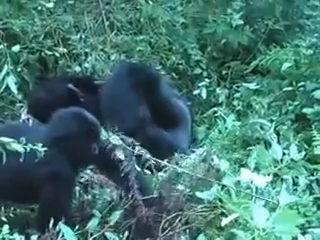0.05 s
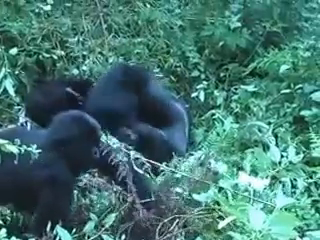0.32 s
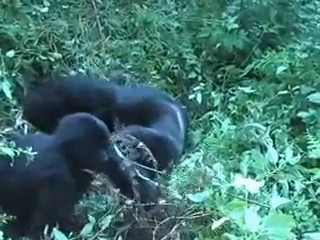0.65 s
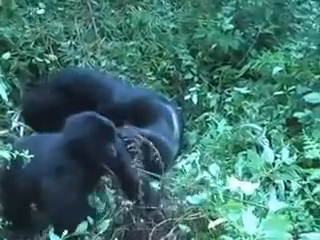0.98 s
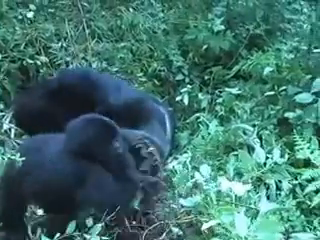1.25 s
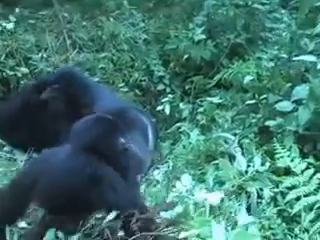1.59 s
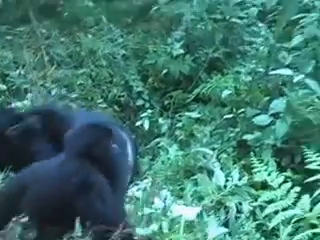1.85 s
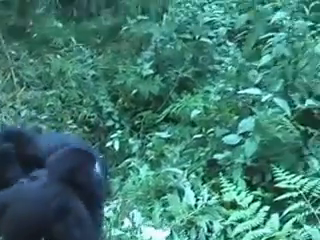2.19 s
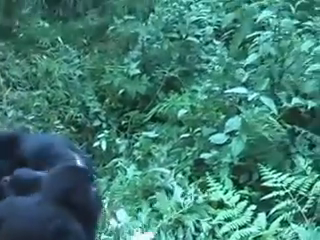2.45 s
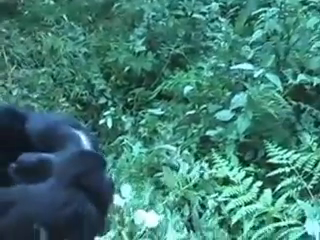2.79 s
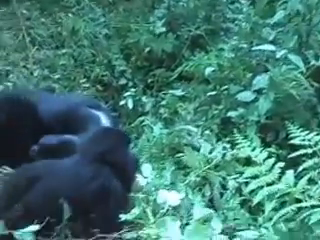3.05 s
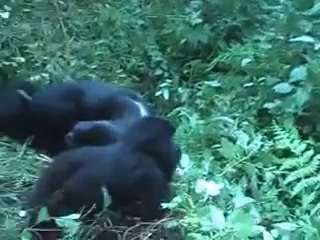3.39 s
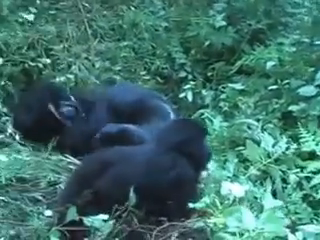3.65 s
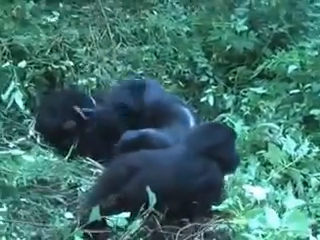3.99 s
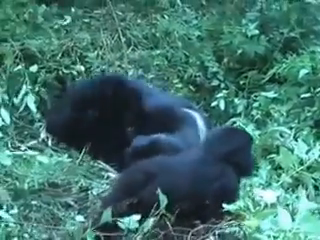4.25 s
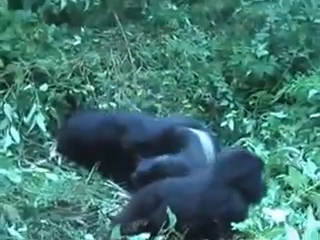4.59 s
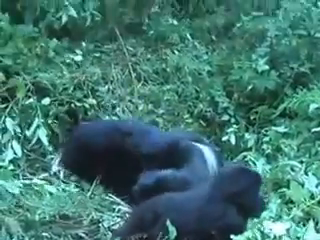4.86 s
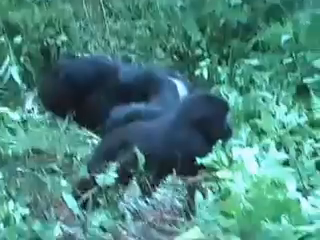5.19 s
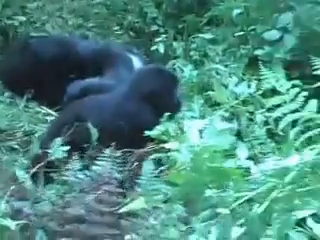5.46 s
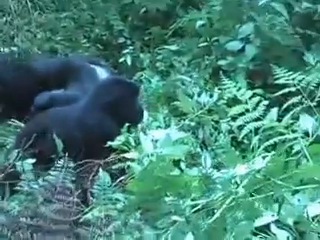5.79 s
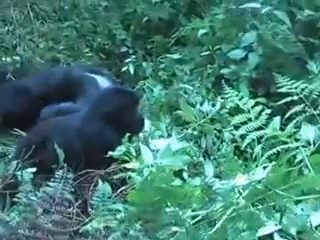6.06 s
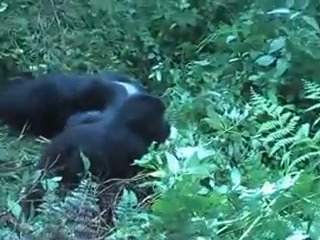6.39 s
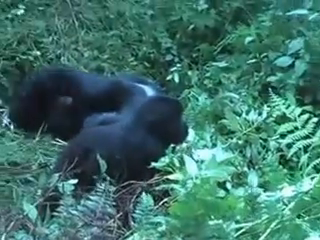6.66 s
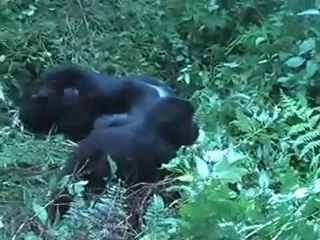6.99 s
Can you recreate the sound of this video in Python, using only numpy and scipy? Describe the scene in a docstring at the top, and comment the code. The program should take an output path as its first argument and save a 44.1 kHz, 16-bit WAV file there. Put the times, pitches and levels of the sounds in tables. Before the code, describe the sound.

A few metres away in dense forest, gorillas wrestle with low, rattling, breathy grunts, short chuckles and faint wheezes. The pants start spaced out, then come faster and hissier in the second half. Stems snap sharply and thicker stalks knock as they break, standing out above the soft rustle of crushed leaves. A small bird repeats a thin, high call over a quiet, steady forest murmur.

```python
"""Gorillas play-wrestling in undergrowth

A few metres away, gorillas pant, chuckle and wheeze: slack vocal folds drive the throat's air sacs,
and turbulent breath excites the resonances of mouth or nose. Stems snap and leaves rustle under them.
A small bird repeats a thin call with both sides of its syrinx, over the steady noise of the forest."""
import sys
import numpy as np
from scipy import signal
from scipy.fft import rfft, irfft, next_fast_len
from scipy.io import wavfile
from scipy.ndimage import uniform_filter1d, map_coordinates

SR = 44100
rng = np.random.default_rng(int(sys.argv[2]) if len(sys.argv) > 2 else 0)


def output_pcm(signal):
    """Save a mono or channel-first signal as 16-bit PCM at the path in sys.argv[1].

    Samples are clipped to [-1, 1] before scaling.
    """
    pcm = np.clip(np.atleast_2d(signal).T, -1, 1) * 32767
    wavfile.write(sys.argv[1], SR, np.round(pcm).astype(np.int16))


N = 309141
TIME = np.arange(N) / SR

# Resonances of the nose, open mouth and teeth: (frequency [Hz], bandwidth [Hz], gain [dB])
NOSE_MODES = [(1035, 170, -6), (1860, 770, -3), (2970, 130, -11.5), (4700, 4700, -1.5)]
MOUTH_MODES = [(795, 240, 10), (1335, 220, 6.5), (2036, 610, 1), (2620, 1100, 9), (3330, 380, 4)]
TEETH_MODES = [(7500, 1300, -3.5), (8420, 1900, 1.5), (12200, 1900, -4.5)]
# Pants: (start [s], end [s], voice [dB], fold slackness [0-1], breath [dB], mouth opening [0-1],
# hoarse ring [Hz], ring [dB], tongue hiss [Hz], hiss [dB], sizzle at the teeth [dB])
PANTS = [ (0.349, 0.51, -55.5, 0.42, -67, 0.3, 2850, -73, 6800, -71, -59.5),
         (0.901, 1.166, -44, .17, -53, 0.09, 2910, -51.5, 5000, -68, -64),
         (1.397, 1.614, -43.5, 0.3, -51, 0.14, 2800, -54, 5950, -74, -59.5),
         (1.873, 2.172, -49.5, 0.41, -57.5, 0.22, 2870, -60, 5360, -65, -82),
         (2.427, 2.633, -46, 0.59, -52, 0.95, 2190, -60, 5670, -59, -59.5),
         (2.849, 3.06, -49, 0.49, -51.5, 0.44, 2720, -67, 5530, -58.5, -67),
         (3.291, 3.454, -49.5, 0.74, -59, 0.5, 3270, -58.5, 5300, -69, -84),
         (3.371, 3.539, -48.5, 0.64, -48.5, 0.74, 3270, -51.5, 5450, -53.5, -65),
         (3.696, 3.859, -46, 0.74, -49, 0.58, 2250, -61, 6000, -52.5, -56.5),
         (4.022, 4.157, -47.5, 0.8, -56.5, 1, 820, -56, 5650, -58, -60),
         (4.325, 4.522, -51.5, 0.77, -61, 0.86, 930, -61, 5600, -79, -72),
         (4.715, 4.894, -46.5, 0.8, -53, 0.8, 3100, -62, 6330, -57.5, -66),
         (5.048, 5.184, -47.5, 0.6, -60, 1, 1140, -54, 5640, -56.5, -67),
         (5.314, 5.449, -46.5, .5, -52, 1, 900, -61, 5900, -55.5, -61.5),
         (5.545, 5.672, -46.5, 0.43, -54, 0.97, 820, -53.5, 5570, -57.5, -62),
         (5.814, 5.96, -47, 0.59, -50, 0.86, 2650, -61, 5500, -55, -54),
         (6.093, 6.244, -46.5, 0.52, -55.5, 0.8, 2880, -59.5, 5440, -55, -55.5),
         (6.407, 6.613, -47, 0.48, -50.5, 0.58, 6850, -57, 5650, -56, -60.5),
         (6.824, 7.039, -45.5, 0.23, -52, 0.96, 3880, -62, 5900, -56.5, -58.5)]
def grunts(taut_hz=73, slack_hz=53, flutter=.8, jaw_bend=.07, ring_glide=.1):
    """Source and filter: the folds rattle the throat and modulate breath noise shaped by the tract."""
    out = np.zeros(N)
    for (start, end, voice_db, slack, breath_db, opening,
         ring_hz, ring_db, hiss_hz, hiss_db, teeth_db) in PANTS:
        length = end - start
        t = np.arange(int(length * SR)) / SR
        count, progress = len(t), t / length
        flap_hz = np.interp(slack, [0, 1], [taut_hz, slack_hz])
        voice, air = throat(count, flap_hz, rough=slack, sag_per_s=0.31)
        voicing = swell(t, length, rise_s=np.interp(slack, [0, .5], [0.07, 0.012]), fall_s=0.039)
        add(out, start, from_db(voice_db + 1.5 * progress) * voice * voicing)

        nose = np.sqrt(1 - opening) * rush(count, NOSE_MODES, spread_db=4.5)
        mouth = np.sqrt(opening) * rush(count, MOUTH_MODES, spread_db=3)
        nostrils = from_db(5) * (1 - opening) ** 4 * whistle(count, hz=1760, width_hz=320)
        breath = from_db(breath_db) * (nose + mouth + nostrils)
        ring = from_db(ring_db) * whistle(count, ring_hz, width_hz=550)
        ring = bent(ring, 1 + ring_glide * opening * progress)
        tongue_modes = [(hiss_hz, 760, 0), (0.87 * hiss_hz, 760, -7)]
        hiss = from_db(hiss_db) * rush(count, tongue_modes, spread_db=2)
        teeth = from_db(teeth_db) * rush(count, TEETH_MODES, spread_db=1)
        jaw = 1 + jaw_bend * opening * np.sin(np.pi * progress)   # resonances rise as the jaw opens
        flow = swell(t, length, rise_s=0.39 * length, fall_s=0.31 * length)
        flow *= (1 - flutter + flutter * air) * from_db(2 * drift(28.3, count))
        add(out, start, flow * (bent(breath + hiss + teeth, jaw) + ring))
    return out


# Resonances of the throat and its air sacs: (frequency [Hz], bandwidth [Hz], gain [dB])
THROAT_MODES = [(74.8, 11, -0.5), (119, 24.7, 1), (208.3, 20.8, 4.5), (260.5, 49, -4), (415, 30.6, -4),
                (547, 220, -12.5)]
def throat(count, rate_hz, rough, sag_per_s):
    """Pulse excitation: uneven, slowing flaps of the folds ring the air sacs; gives sound and airflow."""
    jitter, shimmer, gust_spread = rng.standard_normal((64, 3)).T
    slowing = np.exp(sag_per_s * (np.arange(64) / rate_hz - count / SR / 2))
    periods = slowing * np.exp(0.2407 * rough * jitter)
    at = (np.cumsum(periods) * SR / rate_hz).astype(int)
    at -= at[0]
    inside = at < count
    flaps, gusts = np.zeros((2, count))
    flaps[at[inside]] = from_db(8.4 * rough * shimmer[inside])
    gusts[at[inside]] = from_db(2 * gust_spread[inside])
    air = signal.lfilter([1], [1, -np.exp(-1 / (0.011 * SR))], gusts)   # each gust decays over 11 ms
    air = rms_one(cut(air, 160, "low"))
    leak = 1.63 * rough * air * rng.standard_normal(SR)[:count]
    sacs = rms_one(resonate(rms_one(flaps) + leak, THROAT_MODES))
    rasp = from_db(-1) * rough ** 2 * air * whistle(count, hz=425, width_hz=190)
    sound = cut(sacs + rasp, 470, "low", order=6)
    sound = cut(sound, 48, "high", order=4)
    running_rms = np.sqrt(uniform_filter1d(sound ** 2, size=1500) + 1e-18)
    return sound / running_rms, air


# Voiced puffs: (midpoint [s], level [dB], pitch [Hz])
PUFFS = [(0.04, -50, 121.8), (0.127, -54.5, 135), (0.834, -54.5, 109), (1.127, -52, 220),
         (1.335, -54.5, 100.3), (1.596, -45, 124.8), (1.801, -55, 122), (2.675, -51.5, 256),
         (4.218, -53.5, 251), (4.647, -52.5, 121.5), (5.189, -45.5, 124.4), (5.234, -44.5, 124.3),
         (5.286, -45, 119), (5.46, -48, 118), (5.531, -49, 113), (5.678, -47.5, 91.3), (5.72, -50.5, 117.3),
         (5.761, -51, 95.4), (6.627, -60, 97), (6.669, -53, 91), (6.722, -52, 113), (6.766, -54, 96.8)]
def chuckles(length_s=0.051):
    """Brief phonation: a few nearly periodic flaps fall in pitch under a faint wheeze."""
    out, t = np.zeros(N), np.arange(int(length_s * SR)) / SR
    envelope = swell(t, length_s, rise_s=.022, fall_s=.026)
    for middle, level_db, hz in PUFFS:
        voice, _ = throat(len(t), hz, rough=.1, sag_per_s=2.5)
        wheeze = whistle(len(t), hz=1130, width_hz=380) * np.sin(np.pi * t / length_s) ** 2
        puff = rms_one(voice) + from_db(-9) * wheeze
        add(out, middle - length_s / 2, from_db(level_db) * puff * envelope)
    return out


# Long draws of air: (start [s], end [s], level [dB], frequency [Hz], bandwidth [Hz])
AIR_DRAWS = [(0.0, 0.53, -62.5, 1736, 230), (0.0, 0.538, -64.5, 2820, 300), (2.58, 2.776, -64, 1210, 500),
             (3.042, 3.425, -56.5, 1040, 664), (3.571, 3.908, -62, 1020, 450),
             (4.171, 4.405, -61, 910, 450), (5.077, 5.56, -62, 1140, 380)]
def wheezes():
    """Turbulence at a constriction: fluttering airflow excites one resonance of a narrow passage."""
    out = np.zeros(N)
    for start, end, level_db, hz, width_hz in AIR_DRAWS:
        t = np.arange(int((end - start) * SR)) / SR
        flutter = from_db(2.2 * drift(60, len(t)))
        flow = from_db(level_db) * flutter * swell(t, end - start, rise_s=0.11, fall_s=0.03)
        add(out, start, flow * whistle(len(t), hz, width_hz))
    return out


# Snapping stems: (time [s], nominal level [dB], strongest resonance [Hz], 60 dB decay time [s])
STEM_SNAPS = [ (0.3287, -25.5, 8300, 0.01), (0.5913, -29.5, 5100, 0.024), (0.6375, -30.5, 7450, 0.023),
              (1.4733, -24, 7300, 0.013), (1.6286, -9.5, 5670, 0.014), (2.344, -15, 8100, 0.015),
              (2.3745, -20, 8400, 0.0076), (2.453, -25.5, 7700, 0.0072), (2.585, -19, 7800, 0.019),
              (2.8165, -34, 8500, 0.0086), (3.1461, -23.5, 7030, 0.031), (3.945, -28.5, 3180, 0.026),
              (4.0451, -21, 7140, 0.011), (4.5244, -39, 3930, 0.027), (4.682, -35.5, 8100, 0.017),
              (4.8462, -29.5, 6000, .011), (4.8903, -23, 7400, 0.024), (6.316, -36.5, 4470, 0.021),
              (6.36, -32, 4900, 0.025)]
def stems(shiver_s=0.015, crack_delay_s=.001):
    """Brittle fracture: fibres tear in a burst, the stem parts in one impulse, the foliage shivers."""
    out, t = np.zeros(N), np.arange(SR // 6) / SR
    for start, level_db, hz, decay_s in STEM_SNAPS:
        tear = from_db(-60 * t / decay_s)
        shiver = from_db(-20 - 60 * t / shiver_s)
        burst = (tear + shiver) * np.minimum(t / 0.0014, 1)
        modes = [(1200, 1400, -14), (hz * 0.52, 1600, -6), (hz, 1600, 0),
                 (hz * 1.435, 2200, -2), (hz * 3.3, 6000, -5)]
        add(out, start, from_db(level_db - 9) * burst * rush(len(t), modes, spread_db=1))
        crack = cut(signal.unit_impulse(len(t)), [hz * 0.56, 15000], "band")
        add(out, start + crack_delay_s, from_db(level_db + 6) * crack)
    return out


# Thick stalks giving way: (time [s], level [dB], pitch [Hz])
STALK_KNOCKS = [(1.6292, -21, 2520), (1.630, -33, 1040), (2.343, -35, 2400), (3.9463, -39.5, 1130),
                (4.681, -27.5, 755), (4.846, -27.5, 1200), (4.901, -19, 710), (4.922, -27.5, 1010),
                (6.317, -39.5, 746), (6.361, -34.5, 1050)]
def stalks(ring_cycles=14, splinter_s=0.055):
    """Damped free vibration: a breaking stalk knocks in one hollow mode, with a noise of splinters."""
    out, t = np.zeros(N), np.arange(SR // 6) / SR
    for start, level_db, hz in STALK_KNOCKS:
        wood = np.sin(2 * np.pi * hz * t) * from_db(-60 * t * hz / ring_cycles)
        splinters = 0.17 * whistle(len(t), hz, width_hz=hz) * from_db(-60 * t / splinter_s)
        knock = (wood + splinters) * np.minimum(t * hz, 1)
        add(out, start, from_db(level_db) * cut(knock, hz / 2, "high"))
    return out


# Leaves crushed under the bodies: (time [s], level [dB])
RUSTLE_LEVELS = [(0, -57), (0.35, -57.5), (1.25, -59), (1.55, -54), (2.18, -63), (2.28, -56), (2.64, -53.5),
                 (3.08, -72.5), (3.22, -58), (3.6, -63.5), (4.18, -62.5), (4.42, -56.5), (4.9, -55),
                 (5.7, -61.5), (6.5, -56.5), (7.0, -63)]
# Rustle spectrum: (frequency [Hz], relative spectral density [dB])
LEAF_SPECTRUM = [(300, 10), (800, 18.5), (1600, 13.5), (2900, 14), (4200, 16), (6000, 10), (8500, 20),
                 (10500, -5), (15000, 1)]
def leaves(base_ticks_per_s=900):
    """Friction and shot noise: leaves brush and tick in clumps, more often when crushed harder."""
    level = from_db(np.interp(TIME, *np.transpose(RUSTLE_LEVELS)))
    ticks_per_s = base_ticks_per_s * rms_one(level) * from_db(4 * drift(25, N))
    onsets = rng.random((2, N)) < ticks_per_s / SR
    sizes = from_db(5.5 * np.minimum(rng.exponential(1, (2, N)), 4))
    ticks = onsets * sizes * rng.choice([-1, 1], (2, N))
    flicker = from_db(2 * drift(30, N))
    brushing = rng.standard_normal((2, N))
    return level * flicker * coloured(rms_one(ticks) + brushing, LEAF_SPECTRUM)


# Dry leaves breaking: (time [s], typical tick level before filtering [dB])
TICK_LEVELS = [(0, -29), (2.6, -36), (3.1, -50)]
def crackle(ticks_per_s=25):
    """A Poisson process: dry leaves break independently, in sparse, bright impulses."""
    sizes = from_db(np.interp(TIME, *np.transpose(TICK_LEVELS)) + rng.standard_normal(N))
    onsets = rng.random(N) < ticks_per_s / SR
    return cut(sizes * onsets, 4200, "high")


# Two-voiced calls: (time [s], lower voice [Hz], nominal level [dB])
BIRD_CALLS = [(-0.03, 6690, -48), (0.843, 7090, -49.5), (1.77, 7000, -49.5), (1.81, 6780, -52),
              (2.76, 6900, -49.5), (4.70, 6520, -55), (5.46, 6850, -51), (6.365, 6660, -60),
              (6.743, 5820, -53.5)]
# A farther bird's soft notes: (time [s], pitch [Hz])
FAR_NOTES = [(1.717, 2815), (2.264, 2780), (2.639, 2884), (3.218, 3140)]
def birds(length_s=0.056, upper_ratio=1.16, warble_depth=.026):
    """Biphonation: each side of the syrinx whistles a warbling arch; a farther bird pipes plain notes."""
    out, t = np.zeros(N), np.arange(int(length_s * SR)) / SR
    envelope = swell(t, length_s, rise_s=0.0034, fall_s=0.0084)
    for start, low_hz, level_db in BIRD_CALLS:
        for hz, voice_db in [(low_hz, 0), (low_hz * upper_ratio, -3)]:
            arch = 0.112 * rng.uniform(0.28, 1.33) * (2 * t / length_s - 1) ** 4
            sag = 0.067 * rng.random() * (t / length_s - .5)
            warble = 1 + warble_depth * drift(377, len(t))
            phase = 2 * np.pi * np.cumsum(hz * (1 - arch - sag) * warble) / SR
            add(out, start, from_db(level_db + voice_db) * np.sin(phase) * envelope)
    for start, hz in FAR_NOTES:
        add(out, start, from_db(-58) * whistle(len(t), hz, width_hz=110) * envelope ** 2)
    return 0.68 * out + from_db(-2) * scatter(out, t60=0.43)


# Forest background: (frequency [Hz], relative spectral density [dB])
FOREST_SPECTRUM = [(18, -45), (30, -25), (97, 1), (222, 3.5), (312, -6.5), (437, 1.5), (597, -9),
                   (1030, -10), (3150, -11), (4200, -18), (5730, -6.5), (8470, -15), (15000, -24.5)]
def forest():
    """Stationary noise: a low murmur with a faint high hiss."""
    return from_db(-58) * coloured(rng.standard_normal((2, N)), FOREST_SPECTRUM)


def undergrowth():
    """Scattering: foliage reflects the short waves of apes, plants and birds and lets long ones pass."""
    sources = grunts() + chuckles() + wheezes() + stems() + leaves() + crackle() + birds()
    return sources + from_db(-4.5) * scatter(cut(sources, 335, "high"), t60=0.082) + forest()


def scatter(x, t60):
    """Reverberation: countless reflections from leaves and trunks decay by 60 dB in t60 seconds."""
    t = np.arange(SR // 2) / SR
    echoes = rng.standard_normal(len(t)) * from_db(-60 * t / t60)
    return signal.fftconvolve(x, echoes / np.linalg.norm(echoes))[:N]


def resonate(x, modes):
    """Modal superposition: parallel two-pole resonators with alternating signs."""
    out = 0
    for k, (hz, width_hz, db) in enumerate(modes):
        r = np.exp(-np.pi * width_hz / SR)
        poles = [1, -2 * r * np.cos(2 * np.pi * hz / SR), r * r]
        gain = (-1) ** k * from_db(db) * (1 - r * r) / 2
        out = out + gain * signal.lfilter([1, 0, -1], poles, x + 1e-18)
    return out


def whistle(count, hz, width_hz):
    """Band-limited noise: two passes through one resonance; rms 1."""
    mode = [(hz, width_hz, 0)]
    return rms_one(resonate(resonate(rng.standard_normal(SR)[:count], mode), mode))


def rush(count, modes, spread_db):
    """Formant noise: resonances whose gain and tuning vary at random from call to call; rms 1."""
    out = 0
    for hz, width_hz, db in modes:
        gain = from_db(db + spread_db * rng.standard_normal())
        detune = 1 + 0.0046 * rng.standard_normal()
        out = out + gain * whistle(count, hz * detune, width_hz)
    return rms_one(out)


def bent(x, ratio):
    """Resampling: all resonances move together by a varying ratio, taken relative to its mean."""
    return map_coordinates(x, [np.cumsum(ratio / ratio.mean())], order=3, mode="mirror")


def coloured(pair, spectrum):
    """Spectral shaping: half-octave bands fed in turn by two uncorrelated signals; rms 1."""
    edges = 22 * 2 ** np.arange(0, 10, .5)
    bands = (from_db(at_hz(spectrum, np.sqrt(lo * hi))) * cut(pair[k % 2], [lo, hi], "band")
             for k, (lo, hi) in enumerate(zip(edges, edges[1:])))
    return rms_one(sum(bands))


def cut(x, hz, kind, order=2):
    """Butterworth filter."""
    sections = signal.butter(order, np.clip(hz, 10, .45 * SR), kind, fs=SR, output="sos")
    return signal.sosfilt(sections, x + 1e-18)


def swell(t, length, rise_s, fall_s):
    """Envelope with a quarter-sine rise and fall."""
    return np.sin(np.pi / 2 * np.clip(np.minimum(t / rise_s, (length - t) / fall_s), 0, 1))


def drift(rate, count):
    """Random modulation: `rate` Gaussian values a second, joined by lines."""
    return np.interp(np.arange(count) * rate / SR, np.arange(4096), rng.standard_normal(4096))


def add(out, start_s, sound):
    """Superposes a sound at its time."""
    at = round(start_s * SR)
    sound = sound[max(-at, 0):max(N - at, 0)]
    out[max(at, 0):max(at, 0) + len(sound)] += sound


def at_hz(points, hz):
    """Interpolation over log frequency."""
    frequencies, values = np.transpose(points)
    return np.interp(np.log(hz), np.log(frequencies), values)


def from_db(db):
    return 10 ** (np.asarray(db) / 20)


def rms_one(x):
    return x / np.sqrt(np.mean(x ** 2) + 1e-20)


# Stereo side signal: (frequency [Hz], gain [dB], share in quadrature with the mid [-1 to 1])
SIDE_BANDS = [(238, -15, -1), (397, -7.5, -0.32), (600, -2.5, 0.36), (970, -8, 0.64), (2040, -7, 0.55),
              (2950, -17.5, 0), (5250, -43, 0), (9200, 0, 0.71), (14500, -10, 0.12)]
def scene():
    """Mid-side stereo: the apes are ahead; the side mixes a phase-shifted mid with decorrelated sound."""
    mid = undergrowth() + stalks()
    size = next_fast_len(N, True)
    hz = np.maximum(np.fft.rfftfreq(size, 1 / SR), 1)
    share = at_hz([(band_hz, part) for band_hz, _, part in SIDE_BANDS], hz)
    side_db = at_hz([(band_hz, db) for band_hz, db, _ in SIDE_BANDS], hz)
    quadrature = 1j * share * rfft(mid, size)
    diffuse = np.sqrt(1 - share ** 2) * rfft(undergrowth(), size)
    side = irfft((quadrature + diffuse) * from_db(side_db), size)[:N]
    return np.array([mid + side, mid - side]) * from_db([[.4], [-.4]])


def record(dry):
    """Band limiting: an elliptic low-pass cuts steeply above 15.7 kHz."""
    return signal.sosfilt(signal.ellip(10, .2, 80, 15700, fs=SR, output="sos"), dry)


dry = scene()
out = record(dry)
output_pcm(out)
```